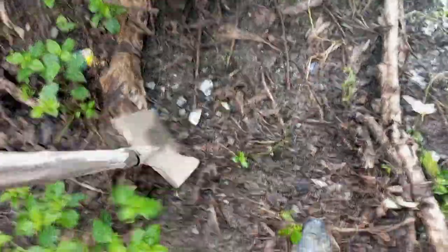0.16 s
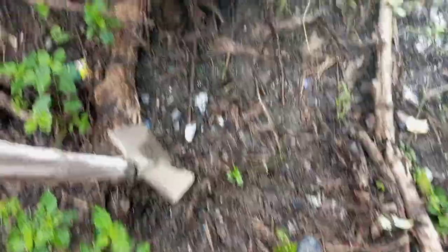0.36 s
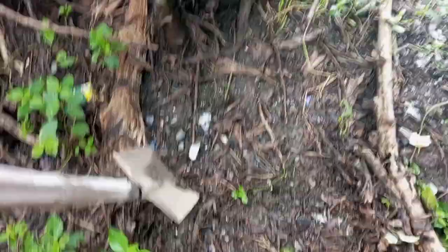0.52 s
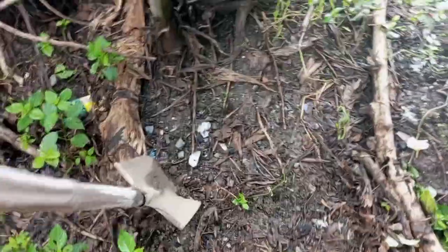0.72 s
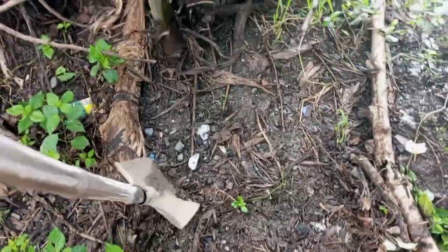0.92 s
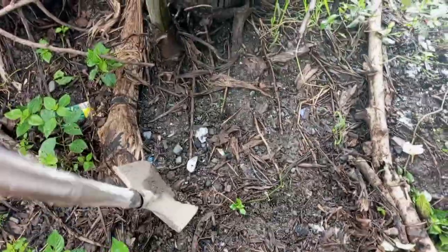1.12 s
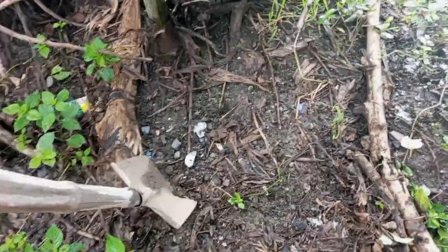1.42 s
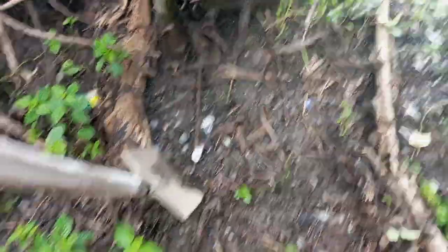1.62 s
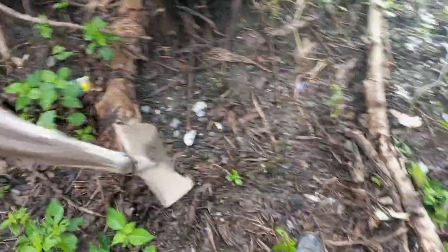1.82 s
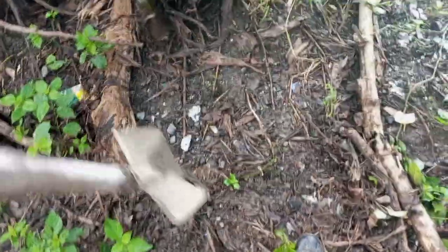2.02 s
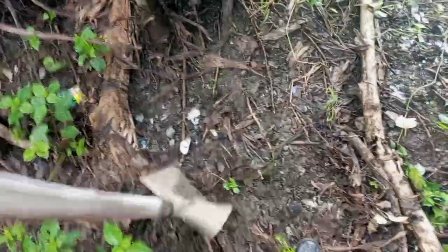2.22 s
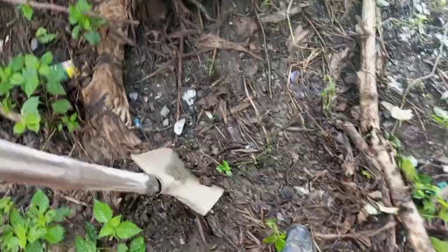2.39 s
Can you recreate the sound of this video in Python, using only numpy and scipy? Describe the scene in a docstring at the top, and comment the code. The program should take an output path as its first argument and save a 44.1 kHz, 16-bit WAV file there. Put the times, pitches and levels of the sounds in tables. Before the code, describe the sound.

A hand hoe chops into stony soil close to the microphone, with hard knocks, a crunch and a brief steel ring. Loose soil trickles, the hoe ticks, then chops again. A faint bird and insects sit behind, outdoors.

```python
"""Outdoors on stony ground, a hand hoe close by chops twice into soil and roots.
Each chop is a few hard knocks on stones, a short damped ring of the steel blade, a dull thud and a
crunch that dies as the blade stops. Loose soil trickles, and the hoe bumps in the hands and ticks as
it is lifted. Behind it sit faint squeaks, a distant bird, high insects and an uneven low rumble."""
import sys
import numpy as np
from scipy import signal
from scipy.fft import rfft, irfft, next_fast_len
from scipy.io import wavfile

SR = 44100
rng = np.random.default_rng(int(sys.argv[2]) if len(sys.argv) > 2 else 0)


def int16_out(signal):
    """Quantize to a 16-bit WAV file."""
    q = np.round(np.clip(np.atleast_2d(signal).T, -1, 1) * 32767)
    wavfile.write(sys.argv[1], SR, q.astype(np.int16))


N = 112454


def amp(db):
    """Decibels to gain."""
    return 10 ** (np.asarray(db) / 20)


def unit(x):
    """Scale to rms 1."""
    return x / np.sqrt(np.mean(x ** 2) + 1e-20)


def clock(start=0):
    """Seconds since start, zero before it."""
    return np.maximum(np.arange(N) / SR - start, 0)


def noise():
    """White noise."""
    return rng.standard_normal(N)


def wobble(rate):
    """A random curve through rate points a second."""
    knots = rng.standard_normal(N // 50)
    return np.interp(clock() * rate, np.arange(len(knots)), knots)


def filtered(x, response):
    """EQ x by a gain that is a function of Hz."""
    size = next_fast_len(N + 8192)
    return irfft(rfft(x, size) * response(np.fft.rfftfreq(size, 1 / SR) + 1), size)[:N]


def coloured(x, points, extra=lambda hz: 0):
    """EQ x by (Hz, dB) points plus an extra dB curve, then scale to rms 1."""
    freqs, db = np.transpose(points)
    return unit(filtered(x, lambda hz: amp(np.interp(np.log(hz), np.log(freqs), db) + extra(hz))))


def fade(t, t60):
    """A decay that loses 60 dB in t60 seconds."""
    return np.exp(-np.log(1000) * t / t60)


def strike(t, rise, t60, hold=0):
    """Attack, hold and release, in seconds."""
    return (1 - np.exp(-t / rise)) * fade(np.maximum(t - hold, 0), t60)


def swell(peak, width):
    """A bell-shaped rise and fall around the peak time."""
    return np.exp(-.5 * ((clock() - peak) / width) ** 2)


# The rumble's fader moves. Each row: time in seconds, relative level in dB.
RUMBLE_FADER = [(0.0, -64), (0.16, -52.5), (0.21, -64), (0.36, -52.5), (0.4, -74.5), (0.55, -58.5),
                (0.67, -70), (0.73, -63.5), (1.37, -75), (1.52, -60), (1.57, -70), (1.62, -55), (1.76, -65),
                (1.82, -50.5), (2.16, -73), (2.26, -58), (2.33, -74), (2.55, -75.5)]
# The rumble's tone. Each row: frequency in Hz, gain in dB.
RUMBLE_EQ = [(20, -15), (45, -41), (65, -5), (82, -13), (100, -2), (125, -4.5), (160, -16), (260, -39.5),
             (600, -79.5)]

def rumble(hum_hz=98.9):
    """Low noise and a wavering hum surge and sink together."""
    t = clock()
    hum = np.sqrt(2) * np.sin(2 * np.pi * hum_hz * t + .48 * wobble(4))
    fader = amp(np.interp(t, *np.transpose(RUMBLE_FADER)))
    return fader * (amp(-5) * coloured(noise(), RUMBLE_EQ) + amp(-.5) * hum)


# The tone of the open air. Each row: frequency in Hz, gain in dB.
AIR_EQ = [(30, -5.5), (200, 12), (350, 5), (800, 1), (1300, -1), (2200, 4.5), (4000, -3.5), (6500, -15),
          (8200, -15.5), (9500, -42.5), (15500, -25)]

def air():
    """Still air: a faint bed of noise that drifts in level."""
    return amp(-70.5 + 2.1 * wobble(6)) * coloured(noise(), AIR_EQ)


# The insects' narrow band. Each row: frequency in Hz, gain in dB.
INSECT_EQ = [(4000, -54), (6200, 0), (7000, 14), (7450, 26.5), (7700, 17), (8000, -42.5), (8800, -19)]

def insects():
    """Insects blend into one high, slightly shimmering hiss."""
    return amp(-62.5 + .49 * wobble(42)) * coloured(noise(), INSECT_EQ)


# Faint squeaks and chirps. Each row: peak time and width in seconds, level in dB, pitch in Hz.
SQUEAK_CUES = [(.01, .012, -49, 2640), (.375, 0.017, -56, 3310), (.40, 0.063, -58.5, 3625),
               (.47, 0.036, -55, 5644), (.51, 0.02, -57, 2890), (.51, 0.013, -60.5, 1377),
               (.525, .018, -67, 4190), (0.818, 0.022, -65.5, 3673), (1.75, 0.019, -69, 794),
               (1.827, 0.024, -64.5, 2606), (1.472, .02, -69.5, 1382), (1.88, 0.034, -70.5, 808),
               (2.453, .024, -55, 2140)]

def squeaks(half_width_hz=43):
    """Brief, thin whistles of narrow-band noise."""
    out = np.zeros(N)
    for peak, width, db, pitch in SQUEAK_CUES:
        whistle = filtered(noise(), lambda hz: 1 / (1 + ((hz - pitch) / half_width_hz) ** 2))
        out += amp(db) * swell(peak, width) * unit(whistle)
    return out


# Handling bumps. Each row: peak time and width in seconds, level in dB, centre in Hz.
BUMP_CUES = [(.05, 0.04, -62, 64), (0.353, 0.014, -56, 144), (1.49, 0.033, -58, 66),
             (1.841, 0.018, -64.5, 70)]

def bumps(width_octaves=.35):
    """Handling the hoe makes soft, low bumps around the strokes."""
    out = np.zeros(N)
    for peak, width, db, centre in BUMP_CUES:
        band = filtered(noise(), lambda hz: np.exp(-.5 * (np.log2(hz / centre) / width_octaves) ** 2))
        out += amp(db) * swell(peak, width) * unit(band)
    return out


# Spills of soil. Each row: peak time and width in seconds, level in dB, top-end boost or cut in dB.
SPILL_CUES = [(0.063, 0.047, -62, -17), (0.187, 0.022, -54.5, -23), (.36, 0.016, -58.5, -10),
              (0.468, 0.034, -50.5, 11), (.64, 0.0094, -66.5, 10), (0.821, 0.047, -66.5, 4),
              (.98, .045, -63.5, 10), (1.233, 0.032, -61.5, 2), (1.555, 0.023, -63, 11.5),
              (1.838, .022, -59, -17)]
# The rustle's tone. Each row: frequency in Hz, gain in dB.
SPILL_EQ = [(300, -16.5), (700, -14.5), (1200, -15.5), (2500, -1), (3600, -0.5), (4500, 1.5), (5700, 12.5),
            (7500, 12.5), (8400, -10.5), (9500, -28.5), (12000, -22.5), (15500, -2)]

def spills(flutter_db=1.5, crossover_hz=9000):
    """Loose soil and leaves rustle in soft, uneven swells."""
    hiss = coloured(noise(), SPILL_EQ) * amp(flutter_db * wobble(120))
    top = filtered(hiss, lambda hz: hz > crossover_hz)
    body = hiss - top
    return sum(amp(db) * swell(peak, width) * (body + amp(top_db) * top)
               for peak, width, db, top_db in SPILL_CUES)


def grit(grains_per_s=4000, spread_db=3, grain_share=.55):
    """Tiny fractures of uneven size crackle over the hiss of fine soil."""
    size = amp(spread_db * np.minimum(rng.exponential(size=N), 3))
    grains = (rng.random(N) < grains_per_s / SR) * size * np.sign(noise())
    return np.sqrt(grain_share) * unit(grains) + np.sqrt(1 - grain_share) * noise()


# The chops. Each row: start in seconds, crunch level in dB, attack, slide and 60 dB release
# in seconds, crunch tilt in dB per octave, thud level in dB.
CHOP_CUES = [(.208, -23, 0.0084, 0.067, 0.18, 0.9, -35.5), (2.2942, -22, 0.0049, 0.025, 0.2, 1.6, -43)]
# The tones of the crunch, the finest grit and the ground's thud. Each row: frequency in Hz, gain in dB.
CRUNCH_EQ = [(100, -51.5), (300, -28.5), (700, -13), (1100, -13), (1450, -13.5), (1800, -3), (2300, -0.5),
             (3100, -5), (4200, -2), (5800, -3.5), (7500, -3), (8200, -17), (9200, -34), (12000, -35.5),
             (15500, -23.5)]
FIZZ_EQ = [(5000, -32.5), (8300, 8), (9300, 0), (11500, -12), (13500, 4.5), (15500, 0.5)]
THUD_EQ = [(60, -52), (250, -21), (420, -1.5), (520, -15), (720, 9), (1100, -14.5), (2000, 3.5),
           (6000, -68)]

def crunch(slowing_db_per_s=126, fizz_db=-19):
    """The blade slides through soil and stops; fine grit fizzes while it is fast, the ground thuds."""
    out = np.zeros(N)
    for start, db, rise, slide, t60, tilt, thud_db in CHOP_CUES:
        t = clock(start)
        speed = amp(-slowing_db_per_s * np.minimum(t, slide)) * strike(t, rise, t60, hold=slide)
        fizz_envelope = speed.max() * (speed / speed.max()) ** 2.7  # dies sooner than the crunch
        out += amp(db) * speed * coloured(grit(), CRUNCH_EQ, lambda hz: tilt * np.log2(hz))
        out += amp(db + fizz_db) * fizz_envelope * coloured(noise(), FIZZ_EQ)
        out += amp(thud_db) * strike(t, rise=.003, t60=.15) * coloured(noise(), THUD_EQ)
    return out


# Modes of the steel blade on its handle. Each row: frequency in Hz, 60 dB decay in seconds,
# relative level in dB for the first chop and for the second.
BLADE_MODES = [(420, .12, -53, -45), (760, .08, -32, -46), (1963, .11, -28, -39), (2090, .12, -24, -31),
               (2150, .12, -38, -29), (2410, .2, -36, -35), (2635, .11, -27, -39), (3546, .11, -26, -42),
               (3615, .15, -31, -40), (4220, .12, -27, -36), (5165, .14, -31, -43), (5252, .15, -28, -42),
               (5855, .16, -37, -32), (6890, .14, -36, -28), (7522, .16, -34, -39)]

def blade_ring(waver_radians=.4):
    """The steel rings at each chop and the soil quickly damps it."""
    out = np.zeros(N)
    for chop, (start, *_) in enumerate(CHOP_CUES):
        t = clock(start)
        for hz, t60, *chop_db in BLADE_MODES:
            tone = np.sin(2 * np.pi * hz * t + waver_radians * wobble(150))
            out += amp(chop_db[chop]) * strike(t, rise=.003, t60=t60) * tone
    return out


# Hits on stones and roots. Each row: start in seconds, relative level in dB,
# 60 dB decay in seconds, centre in Hz.
KNOCK_CUES = [(.2083, -23, .016, 1700), (.2099, -13.5, .021, 2000), (.2145, -11.5, .018, 5000),
              (.2243, -25, .015, 1900), (.2268, -16, .025, 4800), (.2315, -23, .016, 1900),
              (2.2985, -11, .007, 2500), (2.3013, -18, .02, 2100), (2.3087, -23, .024, 4500),
              (2.317, -21, .008, 6000)]

def knocks(width_octaves=1.1, low_cut_hz=540):
    """The blade meets stones and roots: short, hard cracks, each focused on its own band."""
    out = np.zeros(N)
    for start, db, t60, centre in KNOCK_CUES:
        focus_db = lambda hz: -10 * np.log10(1 + (2 * np.log2(hz / centre) / width_octaves) ** 2)
        crack = coloured(noise(), CRUNCH_EQ, focus_db)
        out += amp(db) * strike(clock(start), rise=.0003, t60=t60) * crack
    low_cut = signal.butter(2, low_cut_hz, "high", fs=SR, output="sos")
    return signal.sosfilt(low_cut, out)


# The bird's notes. Each row: start and length in seconds, first and last pitch in Hz, level in dB.
BIRD_NOTES = [(.34, 0.2, 1745, 1649, -61.5), (0.798, 0.3, 1867, 1770, -64),
              (1.18, 0.248, 1747, 1704, -61.5), (1.413, 0.207, 1678, 1664, -61)]
# The bird's timbre. Each row: multiple of the pitch, relative level in dB.
BIRD_PARTIALS = [(.5, -18), (1, 0), (2, -19)]

def bird(edge_s=.011, flutter_db=3.2):
    """A bird draws out thin, falling notes, blurred by distance."""
    out = np.zeros(N)
    for start, length, first_hz, last_hz, db in BIRD_NOTES:
        t = clock(start)
        pitch = np.interp(t, [0, length], [first_hz, last_hz])
        phase = 2 * np.pi * np.cumsum(pitch) / SR
        gate = np.clip(np.minimum(t, length - t) / edge_s, 0, 1)
        for multiple, partial_db in BIRD_PARTIALS:
            gain = amp(db + partial_db + flutter_db * wobble(45.66))
            blur = wobble(130)
            out += gate * gain * np.sin(multiple * phase + blur)
    return out


# The hoe's ticks. Each row: start in seconds, relative level in dB.
TICK_CUES = [(1.676, -58), (1.765, -61), (1.842, -49), (2.0805, -40), (2.141, -56)]
# A tick's ring. Each row: frequency in Hz, relative level in dB, 60 dB decay in seconds.
TICK_RING = [(1120, -6, 0.018), (2216, -2, 0.036), (3745, -0.5, 0.024), (4630, -12, 0.019)]
# The tone of a tick's crack. Each row: frequency in Hz, gain in dB.
TICK_EQ = [(300, -32), (900, 0), (4500, -3), (6500, -28), (12000, -60)]

def ticks():
    """Light contacts as the hoe is lifted, each a tiny crack with a short ring."""
    out = np.zeros(N)
    for start, db in TICK_CUES:
        t = clock(start)
        ring = sum(amp(mode_db) * fade(t, t60) * np.sin(2 * np.pi * hz * t)
                   for hz, mode_db, t60 in TICK_RING)
        crack = amp(-1) * (t > 0) * fade(t, t60=.015) * coloured(noise(), TICK_EQ)
        out += amp(db) * (ring + crack) / 2
    return out


def scene():
    """The mono mix: the hoe up front, the outdoor ambience well behind."""
    hoe = crunch() + amp(-1.5) * knocks() + amp(1.5) * blade_ring() + ticks() + bumps()
    return (hoe + spills() + squeaks() + bird() + rumble() + air() + insects())[None]


def record(dry):
    """A brick-wall high cut takes off the very top."""
    return filtered(dry[0], lambda hz: hz < 15900)[None]


dry = scene()
out = record(dry)
int16_out(out)
```